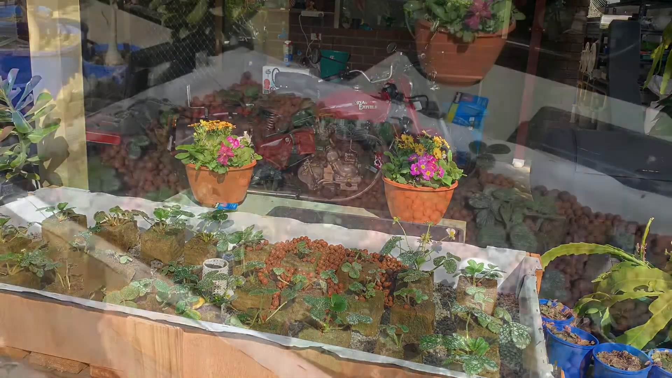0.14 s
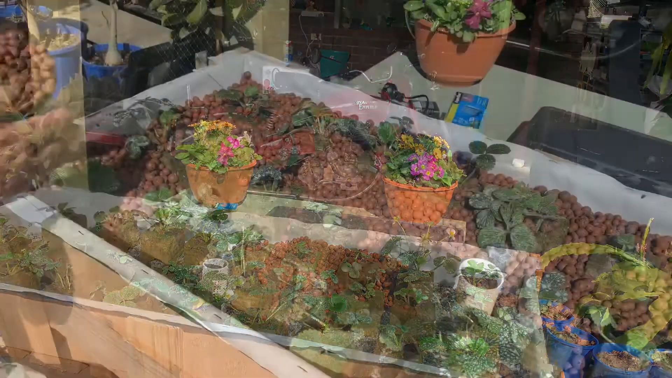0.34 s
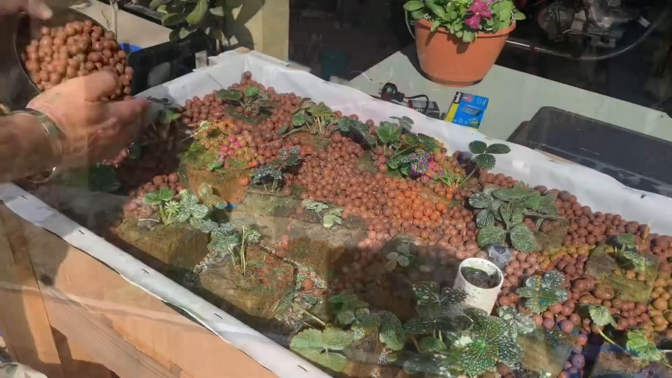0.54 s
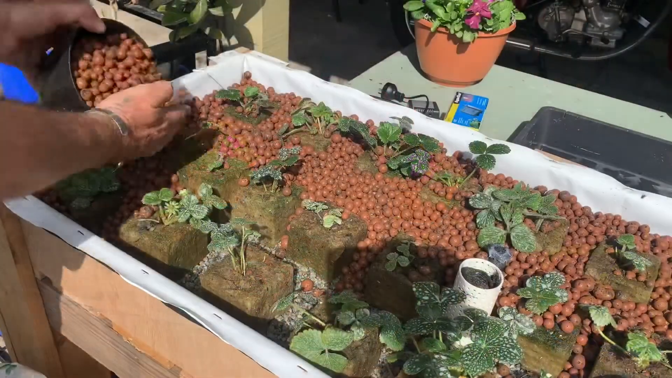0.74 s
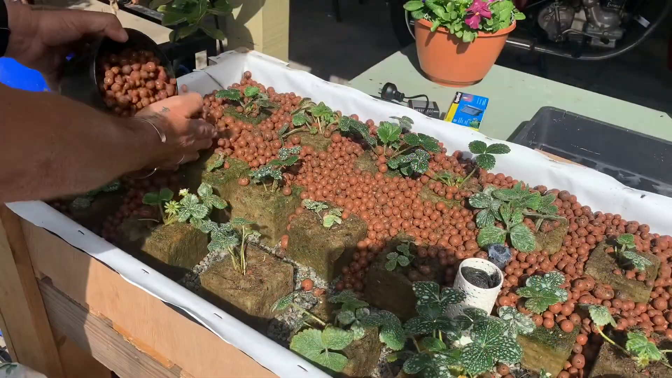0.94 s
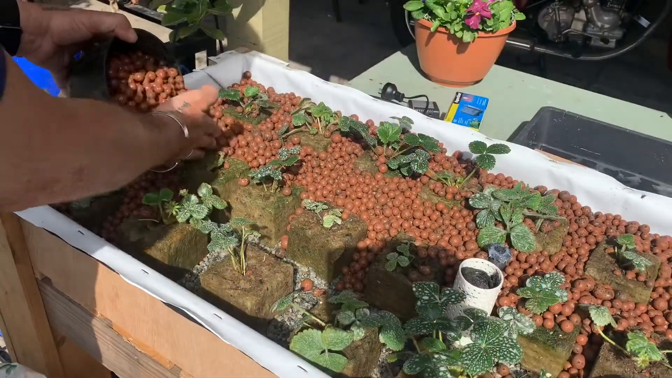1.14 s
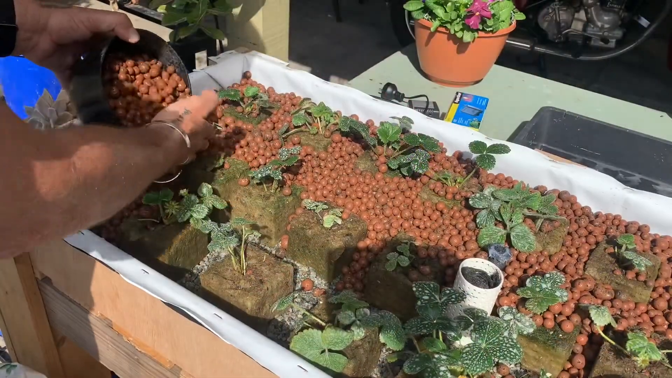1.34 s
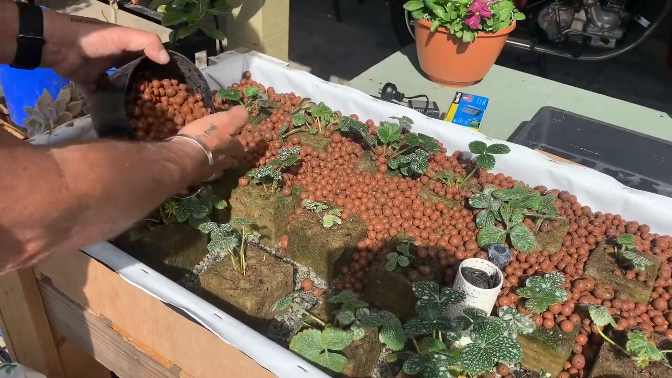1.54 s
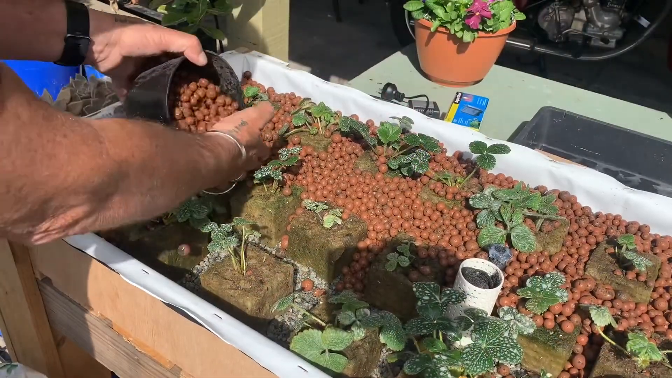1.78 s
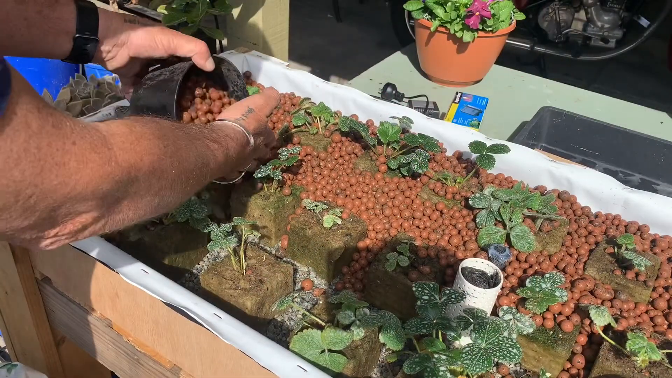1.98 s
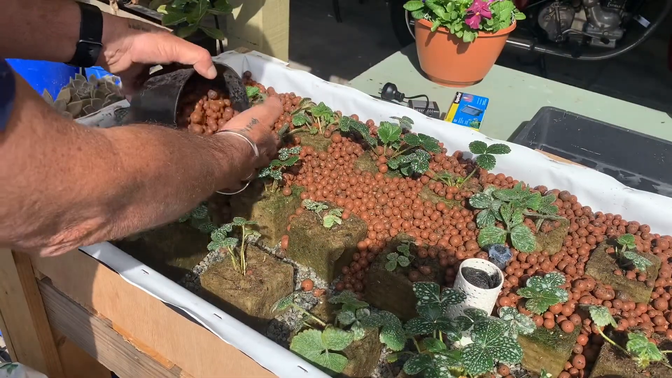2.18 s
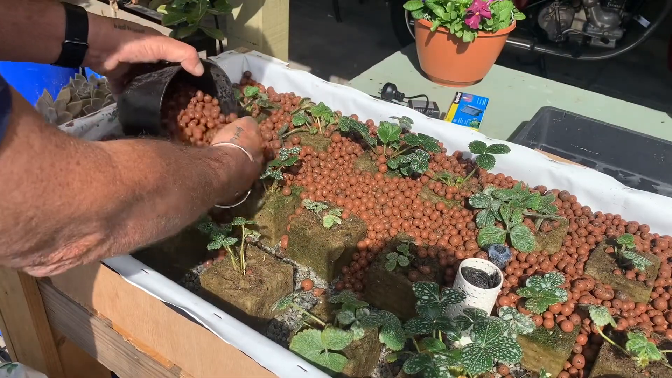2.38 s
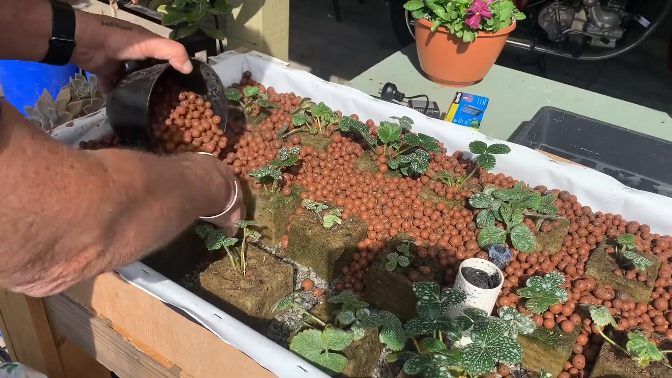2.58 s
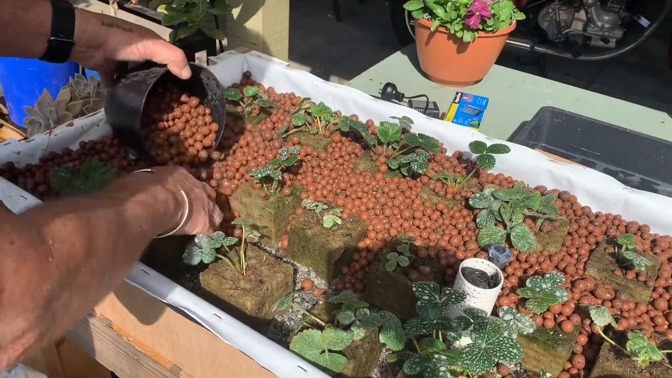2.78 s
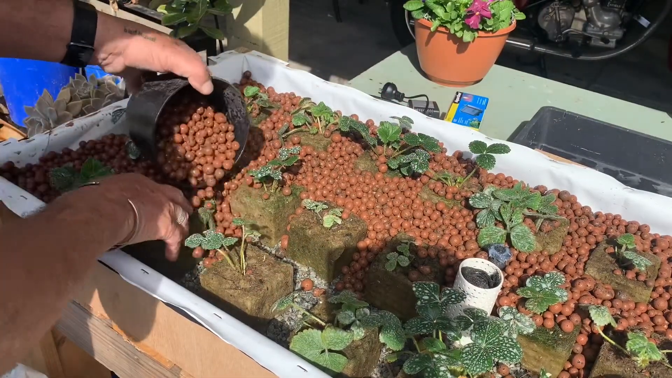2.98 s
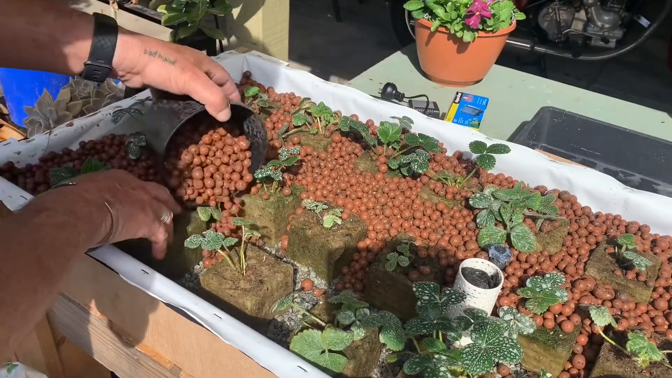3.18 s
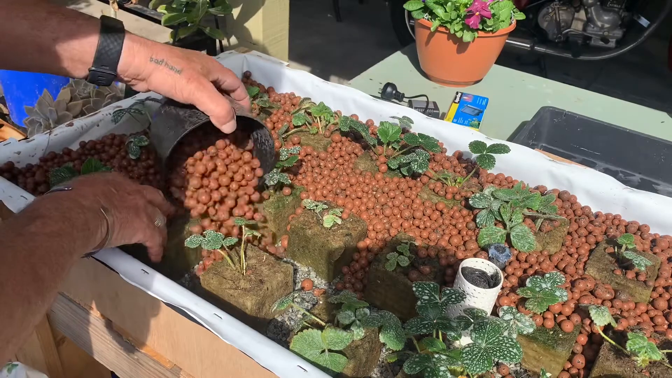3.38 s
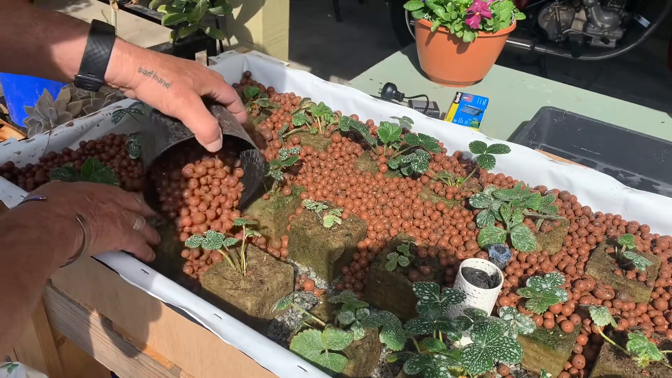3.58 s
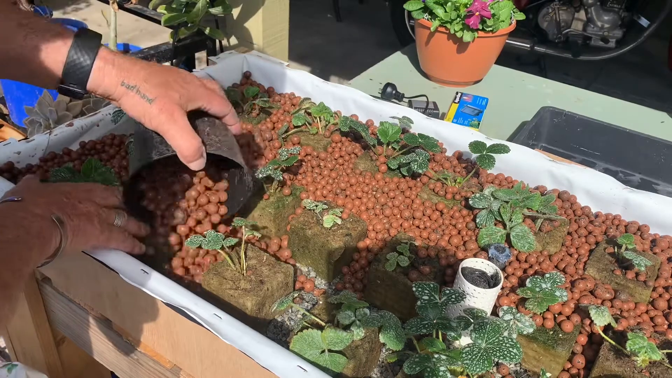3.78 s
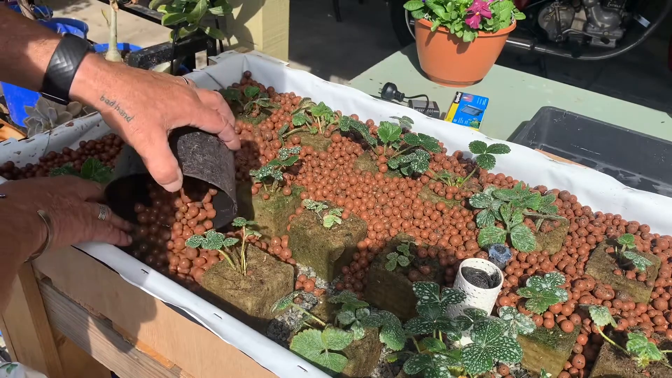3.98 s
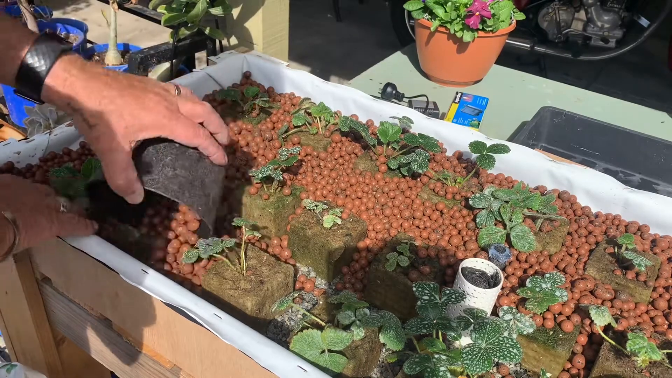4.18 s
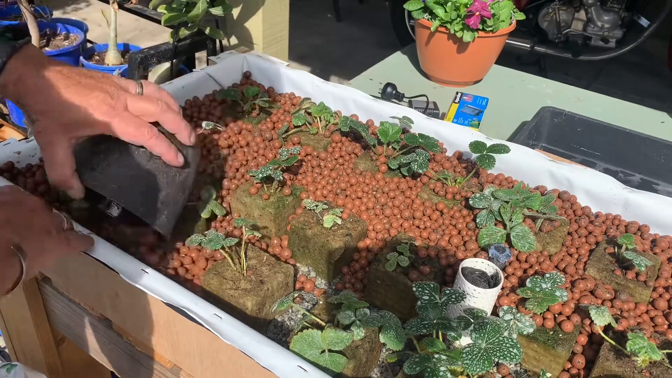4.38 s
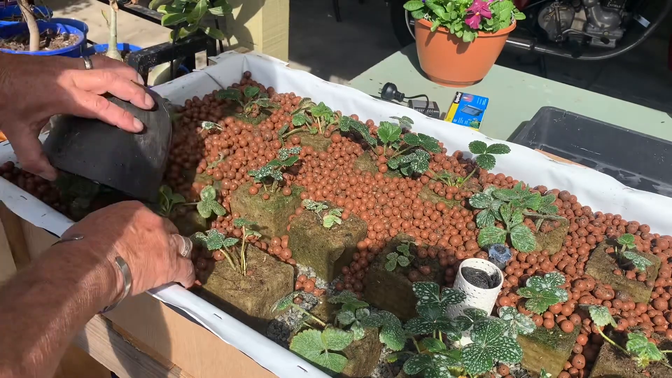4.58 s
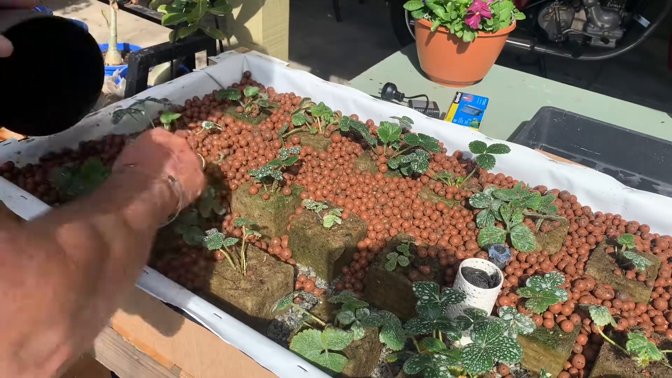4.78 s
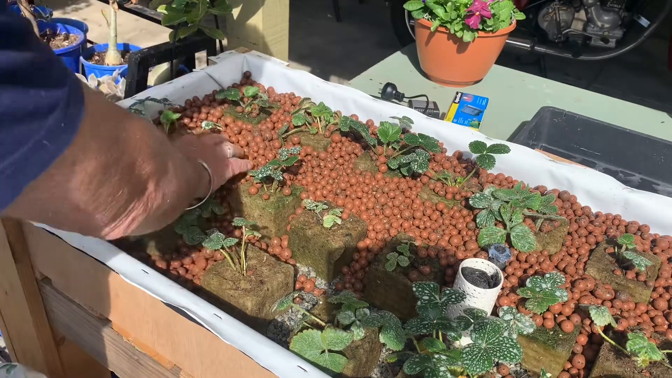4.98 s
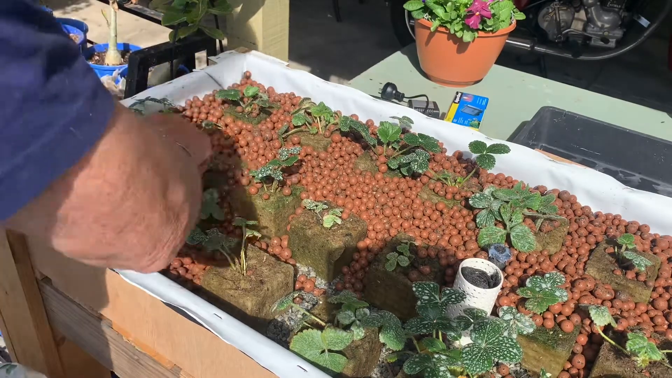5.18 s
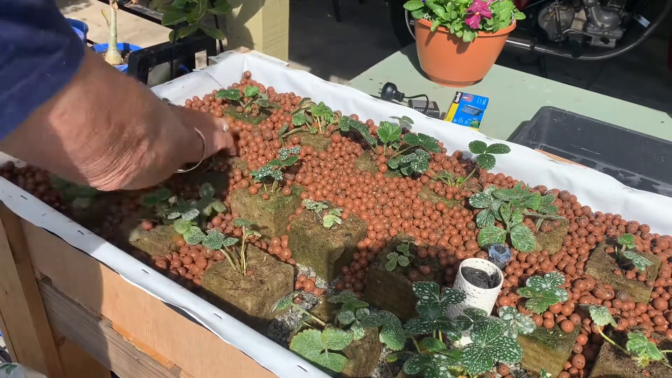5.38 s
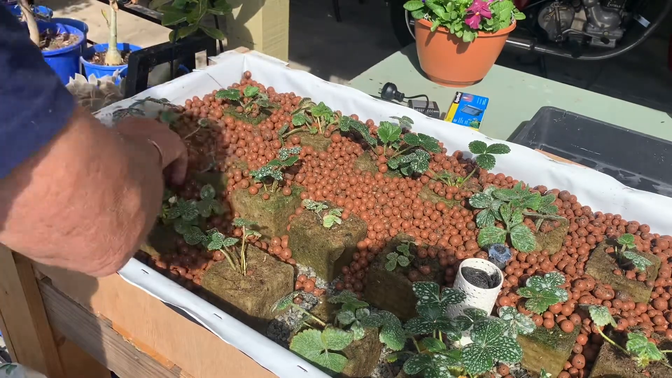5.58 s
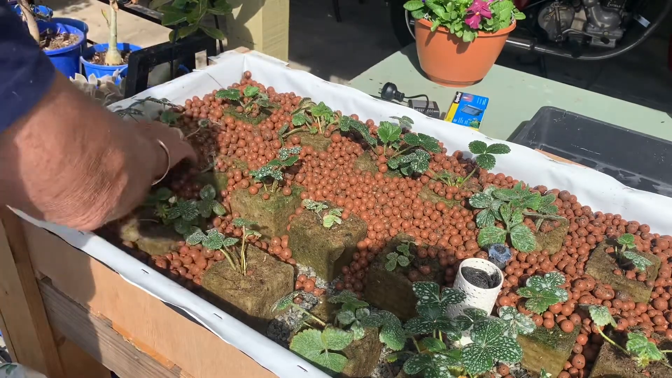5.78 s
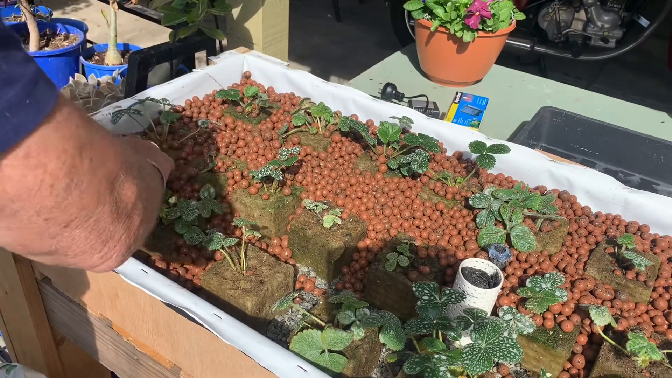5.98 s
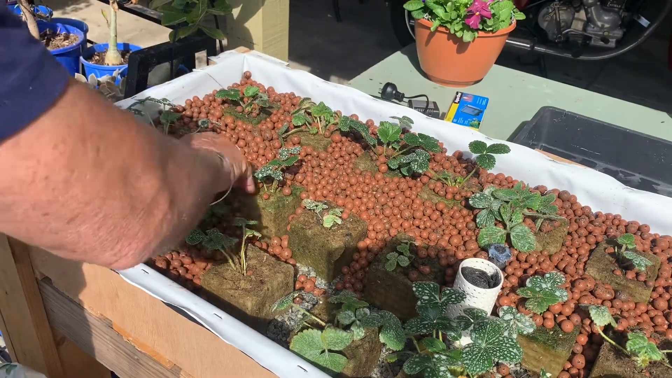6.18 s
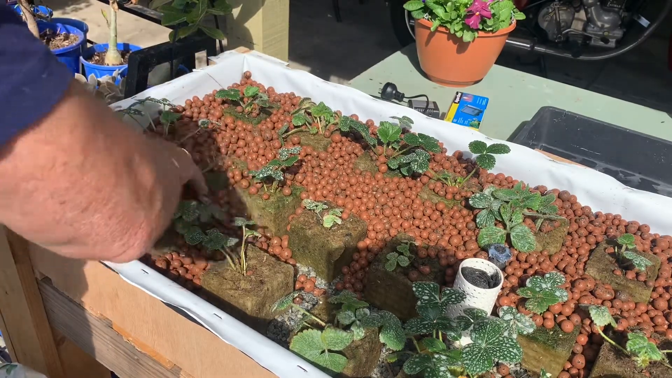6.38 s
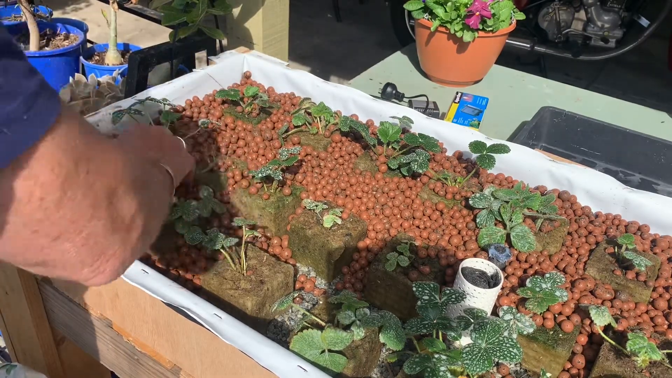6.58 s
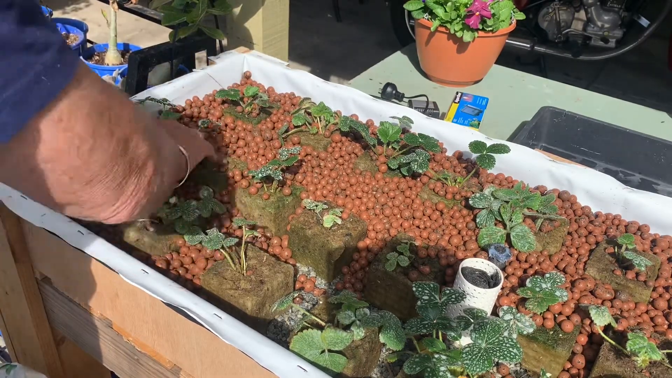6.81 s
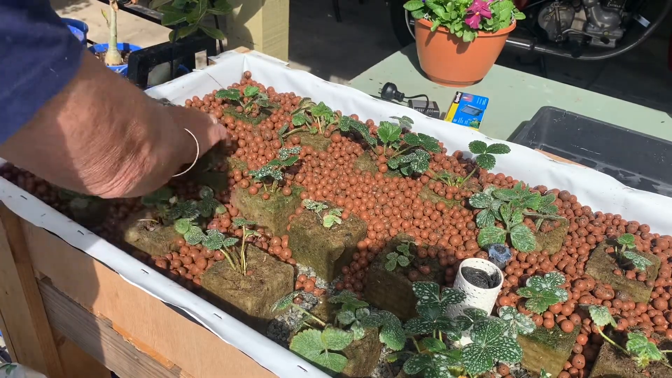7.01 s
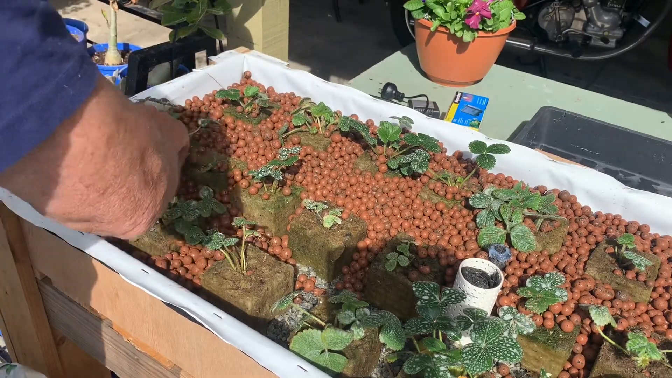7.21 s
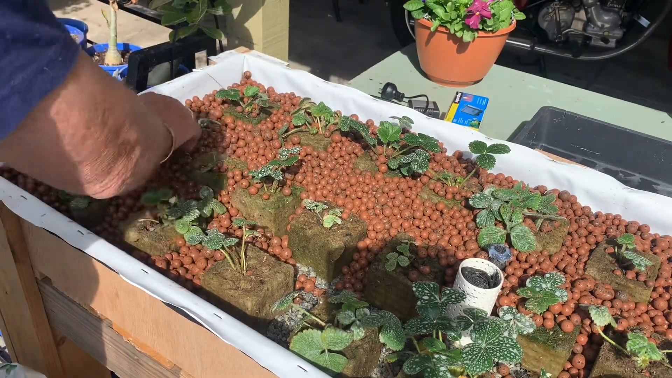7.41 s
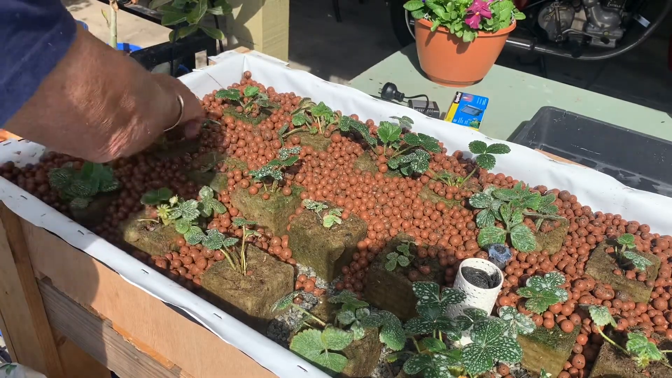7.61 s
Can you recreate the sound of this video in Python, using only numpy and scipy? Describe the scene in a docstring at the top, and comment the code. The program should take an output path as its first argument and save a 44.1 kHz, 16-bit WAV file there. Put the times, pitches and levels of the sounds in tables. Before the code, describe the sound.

Near-silence with faint traffic, then hard little clay balls tumble onto others, bright and brittle over a duller rattle. The flow eases to separate clicks, swells, then a second, fuller pour rushes out and drains with a hollow knock. Afterwards a hand spreads the pebbles in brief clicking swishes with small woody bumps, growing quieter. Outdoors, recorded close in wide stereo, dry and without echo.

```python
"""Clay pebbles poured from a pot

Fired clay pebbles slide out of a plastic pot onto a bed of more pebbles, then a hand spreads them, in a garden.
Each collision is a bright tick made of short, dying noise. The bed and the hollow pot answer with a duller
rattle, and knocks and thuds are bursts of noise sent through resonances. Far traffic rumbles below, with light
wind and a faint hum. Left and right hear it all with a phase difference and a share of their own that change
with pitch."""
import sys
import numpy as np
from scipy import signal
from scipy.fft import rfft, irfft, next_fast_len
from scipy.io import wavfile
from scipy.ndimage import uniform_filter1d

SR = 44100
rng = np.random.default_rng(int(sys.argv[2]) if len(sys.argv) > 2 else 0)


def dump_mix(stems):
    """Bounce the given channels to the path in sys.argv[1] as a 16-bit WAV at rate SR."""
    frames = np.atleast_2d(stems).T  # one column per channel
    limited = np.clip(frames, -1, 1)  # hard clip at full scale
    pcm = np.round(limited * 32767).astype(np.int16)
    wavfile.write(sys.argv[1], SR, pcm)


N = 337365
SIZE = next_fast_len(N + 8192)   # room for filter tails
HZ = np.maximum(np.fft.rfftfreq(SIZE, 1 / SR), 1)

# two pours out of the pot, how loud the stream ticks; each pour: time_s, level_db
POURS = [
    [(0.4, -73.5), (0.6, -43.5), (0.7, -35.5), (0.743, -27.5), (0.768, -33.5), (0.795, -31), (0.815, -30.5),
     (0.868, -28.5), (1.013, -34), (1.227, -36.5), (1.36, -41), (1.58, -43), (1.86, -41), (1.93, -42.5),
     (1.985, -32.5), (2.03, -39.5), (2.135, -32.5), (2.44, -36), (2.6, -39.5), (2.688, -33), (2.834, -47),
     (2.9, -56.5)],
    [(2.7, -94), (2.85, -45), (3.0, -42), (3.193, -30.5), (3.367, -26), (3.58, -27), (3.976, -32.5),
     (4.061, -32.5), (4.275, -36.5), (4.53, -50), (4.62, -54), (4.79, -58), (4.87, -74.5)],
]
# the hand pushes pebbles along: peak_time_s, peak_level_db, rise_db_per_s, fall_db_per_s
PUSHES = [(4.94, -46, 400, 62), (5.066, -37.5, 158, 50), (5.288, -34.5, 6000, 64), (5.39, -53, 111, 58),
          (5.467, -32, 95, 102), (5.852, -39, 39, 86), (6.005, -33.5, 123, 255), (5.7, -46.5, 75, 36),
          (6.114, -43, 55, 99), (6.174, -40.5, 297, 300), (6.295, -45, 500, 701), (6.231, -45, 95, 300),
          (6.352, -35.5, 1500, 159), (6.52, -56.5, 97.5, 97), (6.759, -40, 208, 215),
          (6.825, -47.5, 500, 171), (6.92, -47, 154, 360), (6.98, -56, 402, 39), (7.1, -46, 73, 69),
          (7.42, -62, 39, 100), (7.518, -54, 249, 201), (7.63, -55.5, 163, 20)]
# single pebbles that stand out: start_s, level_db (before the common lift)
SINGLE_PEBBLES = [(0.0074, -56), (0.1483, -56), (0.6344, -15), (0.7035, -11), (0.7208, -16), (0.7431, -14),
                  (0.7494, -6), (0.7536, -15), (0.7767, -20), (0.8, -11), (0.8069, -18), (0.8368, -13),
                  (0.86, -16), (0.8692, -13), (0.9122, -18), (0.9171, -15), (0.9814, -19), (1.0359, -22),
                  (1.1922, -24), (1.2188, -23), (1.2303, -21), (1.2501, -24), (1.2605, -22), (1.2911, -24),
                  (1.3211, -24), (1.3523, -27), (1.3598, -23), (1.3689, -20), (1.3783, -24), (1.3941, -28),
                  (1.4063, -26), (1.435, -28), (1.4753, -28), (1.4863, -21), (1.504, -25), (1.5276, -28),
                  (1.5355, -15), (1.5458, -28), (1.6083, -30), (1.6303, -28), (1.6528, -28), (1.6715, -16),
                  (1.6875, -28), (1.7069, -19), (1.7183, -26), (1.7246, -26), (1.7373, -24), (1.7514, -20),
                  (1.7642, -28), (1.7716, -16), (1.8187, -18), (1.8303, -22), (1.8352, -25), (1.8641, -18),
                  (1.8937, -19), (1.9168, -15), (1.9338, -25), (1.9646, -22), (1.9746, -12), (1.9791, -16),
                  (2.0003, -23), (2.006, -23), (2.027, -24), (2.042, -16), (2.0547, -23), (2.0612, -20),
                  (2.102, -19), (2.1157, -18), (2.1266, -19), (2.1401, -19), (2.1471, -17), (2.1657, -17),
                  (2.1737, -18), (2.1912, -21), (2.2252, -20), (2.2474, -17), (2.2513, -19), (2.294, -16),
                  (2.3134, -17), (2.3383, -21), (2.3441, -20), (2.3486, -14), (2.3579, -20), (2.4022, -21),
                  (2.4409, -19), (2.4806, -23), (2.5148, -22), (2.522, -24), (2.5272, -21), (2.5596, -22),
                  (2.5764, -25), (2.5992, -20), (2.6185, -24), (2.6301, -18), (2.6376, -18), (2.6629, -23),
                  (2.6858, -22), (2.701, -19), (2.7063, -19), (2.7296, -27), (2.7653, -29), (2.7851, -27),
                  (2.8208, -28), (2.8437, -23), (2.8522, -24), (2.8607, -17), (2.8892, -29), (2.8984, -24),
                  (2.9249, -28), (2.9354, -30), (2.9437, -27), (2.9485, -24), (2.9679, -28), (2.9872, -14),
                  (2.9981, -16), (3.0098, -20), (3.0173, -21), (3.0413, -24), (3.0533, -23), (3.0832, -16),
                  (3.1078, -18), (3.1221, -21), (3.1311, -14), (3.1616, -21), (3.1691, -17), (3.2235, -16),
                  (3.2395, -16), (3.2814, -14), (3.3251, -16), (3.3595, -14), (3.3789, -16), (3.3935, -14),
                  (3.4767, -14), (3.5199, -13), (3.5651, -13), (3.5838, -16), (3.6279, -14), (3.6544, -17),
                  (3.6767, -17), (3.725, -19), (3.7786, -14), (3.7988, -18), (3.8393, -17), (3.8646, -19),
                  (3.9079, -21), (3.9609, -21), (3.9882, -20), (4.0317, -19), (4.0464, -15), (4.073, -20),
                  (4.0808, -18), (4.1152, -21), (4.1277, -22), (4.1784, -23), (4.2085, -22), (4.2224, -21),
                  (4.2306, -22), (4.2353, -23), (4.2601, -18), (4.2747, -21), (4.2792, -24), (4.3194, -26),
                  (4.3238, -23), (4.3446, -22), (4.3721, -22), (4.3824, -22), (4.4034, -25), (4.4271, -25),
                  (4.4476, -29), (4.4586, -31), (4.4768, -26), (4.4957, -26), (4.5211, -28), (4.5701, -37),
                  (4.5783, -38), (4.6132, -29), (4.6321, -41), (4.6389, -30), (4.6425, -35), (4.6643, -38),
                  (4.667, -37), (4.6788, -29), (4.6995, -42), (4.7515, -32), (4.7771, -28), (4.8964, -41),
                  (4.9041, -26), (4.9757, -30), (5.007, -28), (5.0186, -29), (5.0249, -29), (5.0508, -22),
                  (5.0579, -21), (5.075, -23), (5.0812, -25), (5.0988, -23), (5.1157, -16), (5.155, -26),
                  (5.161, -19), (5.1693, -25), (5.2171, -33), (5.2512, -26), (5.2696, -31), (5.2927, -18),
                  (5.2982, -22), (5.336, -25), (5.3896, -22), (5.431, -24), (5.4408, -22), (5.5103, -25),
                  (5.5289, -25), (5.5507, -16), (5.5568, -21), (5.5754, -28), (5.5944, -30), (5.6039, -25),
                  (5.651, -28), (5.6636, -32), (5.6779, -27), (5.6911, -28), (5.6987, -20), (5.7159, -28),
                  (5.7215, -26), (5.7319, -30), (5.7377, -19), (5.7604, -26), (5.8685, -27), (5.8893, -28),
                  (5.9079, -28), (5.9488, -24), (5.9996, -24), (6.0069, -23), (6.0541, -27), (6.0862, -31),
                  (6.0949, -29), (6.1092, -24), (6.119, -22), (6.13, -30), (6.146, -29), (6.1603, -20),
                  (6.1718, -21), (6.1841, -29), (6.2082, -33), (6.2144, -30), (6.2193, -24), (6.2389, -29),
                  (6.2536, -37), (6.2639, -29), (6.2876, -27), (6.2921, -28), (6.3107, -34), (6.3489, -32),
                  (6.3628, -26), (6.3809, -32), (6.3875, -31), (6.4781, -35), (6.524, -35), (6.5437, -44),
                  (6.5535, -33), (6.5929, -49), (6.6574, -39), (6.6722, -36), (6.6825, -38), (6.7184, -33),
                  (6.7411, -34), (6.7598, -23), (6.7652, -24), (6.7715, -25), (6.7938, -34), (6.8195, -30),
                  (6.8525, -33), (6.8609, -30), (6.8725, -25), (6.8864, -35), (6.902, -35), (6.9186, -25),
                  (6.9326, -36), (6.9729, -21), (6.9974, -38), (7.0416, -32), (7.0703, -35), (7.0817, -28),
                  (7.0928, -29), (7.1052, -30), (7.1145, -37), (7.1278, -24), (7.1515, -32), (7.1601, -28),
                  (7.1687, -27), (7.1816, -34), (7.1977, -38), (7.2542, -42), (7.2822, -36), (7.3156, -45),
                  (7.3211, -44), (7.3537, -37), (7.3623, -48), (7.371, -38), (7.4085, -39), (7.4135, -41),
                  (7.4345, -40), (7.4833, -46), (7.4993, -44), (7.5064, -35), (7.5152, -36), (7.5235, -42),
                  (7.5613, -47), (7.5939, -34), (7.6104, -27), (7.6248, -45)]
# ringing modes of one pebble, before small random changes: pitch_hz, width_hz, level_db
PEBBLE_MODES = [(6070, 4000, -14.5), (9530, 3450, 5), (14000, 2200, -11.5)]
# colour of the streaming ticks: pitch_hz, gain_db (noise power per Hz)
TICK_COLOUR = [(1500, -45), (3000, -16), (5200, -11), (6400, -6.5), (7700, -3.5), (9000, -1.5), (10500, -3),
               (12000, -10.5), (14000, -10), (16000, -30)]
# colour of the bed's rattle: pitch_hz, gain_db (noise power per Hz)
RATTLE_COLOUR = [(40, -44.5), (110, -5.5), (220, -10.5), (500, -6), (900, -6), (1800, -4), (3000, 2.5),
                 (4500, -6.5), (7000, -11.5)]
# rattle while tipping, pouring, emptying and spreading:
# start_s, level_db (at a middling flow), share (of the flow's swing in dB)
RATTLE_STAGES = [(0, -43, 0.48), (1.55, -43.5, 0.68), (2.95, -42.5, 0.7777), (4.6, -53, 0.56)]
# ringing hollows: full pot tilting, pot half lying, pot tipped over and emptying, wooden trough under the hand:
# start_s, level_db (against the bed), modes (each pitch_hz, width_hz, level_db)
HOLLOWS = [(0, -10.5, [(690, 95, 3.5), (1540, 100, 2), (362, 72, -10)]), (1.45, -3.5, [(676, 79, 4),
           (1582, 100, 4), (516, 230, -6.5)]), (2.951, -5, [(600, 310, 1.5), (1240, 190, -1.5),
           (1870, 220, 3), (2550, 310, -20)]), (4.6, 2.5, [(650, 320, 5), (380, 200, 1.5),
           (1100, 260, -9.5), (2280, 900, -10.5)])]
# pebbles knocking dully on a wall: start_s, peak_level_db
WALL_KNOCKS = [(0.721, -23.5), (1.035, -27.5), (1.156, -21.5), (1.226, -23), (1.395, -36.5), (1.801, -20.5),
               (1.971, -27), (2.377, -34), (3.18, -22.5), (4.037, -32), (4.254, -46), (6.163, -32),
               (6.349, -33.5), (6.974, -35)]
# pot and hand bumping, heaps dropping: start_s, peak_level_db, pitch_hz, puff_t60_s (time to fall 60 dB)
BUMPS = [(.008, -42, 2220, 0.0079), (0.146, -49, 764, 0.053), (.146, -46, 3250, 0.07),
         (0.243, -52.5, 800, 0.033), (0.52, -41, 134, 0.054), (0.559, -42.5, 98, 0.14),
         (0.753, -34.5, 392, 0.042), (0.87, -33.5, 960, 0.056), (1.036, -34, 724, 0.085),
         (3.298, -36, 235, 0.28), (4.0349, -25, 516, 0.36), (4.036, -29, 860, 0.096),
         (4.037, -28.5, 1320, 0.05), (4.06, -32, 397, 0.44), (4.049, -34, 212, 0.53),
         (4.446, -40, 1250, .03), (4.629, -46, 1210, .015), (4.666, -45, 900, .02),
         (4.776, -46.5, 1520, 0.034), (5.185, -46, 650, .04), (5.288, -38.5, 710, 0.17),
         (5.312, -36, 440, 0.037), (5.815, -40.5, 615, 0.054), (5.84, -47, 656, .04),
         (5.87, -42, 730, 0.072), (5.992, -40.5, 600, 0.058), (6.108, -45, 616, 0.027),
         (6.158, -41, 520, .03), (5.29, -49, 199, 0.22), (6.902, -39, 170, 0.07), (7.622, -49, 1070, 0.052),
         (7.644, -33, 615, 0.089)]
# colour of the garden background: pitch_hz, gain_db (noise power per Hz)
GARDEN_COLOUR = [(15, -21), (35, -15), (64, 2), (110, 1), (200, -7), (400, -13.5), (900, -23.5),
                 (1500, -19), (4000, -26), (8400, -28), (11000, -56), (16000, -80)]
# light wind on the ports: time_s, level_db
WIND = [(0.0, -59), (0.36, -58.5), (0.91, -88), (4.47, -60), (5.52, -61.5), (7.37, -69), (7.65, -52)]
# the two ports: pitch_hz, left_lead_rad, alike_share (0 to 1, heard alike by both), left_over_right_db
PORTS = [(0, 0, .92, -1), (130, 0, .92, -1.3), (300, .7, .75, -0.5), (900, .8, .55, 3.5),
         (1600, 2.2, .5, 0.1), (2300, 3.1, .6, 0.1), (2900, 3.4, .75, -1), (4600, 6.1, .45, -2),
         (5700, 5.3, .42, -5), (6500, 4.6, .4, -1), (7000, 3.0, .62, 0.5), (9100, 0.05, .9, 0.1),
         (10400, -1.5, .72, 0.1), (11300, -3.0, .97, 0.1), (12000, -3.2, .97, 0.1), (12700, -4.4, .6, 0.1),
         (13500, -6.2, .95, 0.1), (14500, -6.4, .85, 0.1), (16000, -9.3, .6, 0.1)]

REST_DB, MIDDLING_DB = -81.5, -40   # ticking of the bed left alone; a middling flow
TICK_LIFT_DB = 0.7                  # raises all single pebbles over the stream
CRACK_T60_S, SCATTER_T60_S, SCATTER_DB = 0.0017, 0.029, 6
GARDEN_DB, HUM_HZ, HUM_DB = -57, 301, -69
EDGE_HZ, CUTOFF_HZ = 15750, 16600


def amp(db):
    """Turn decibels into gain."""
    return 10 ** (np.asarray(db) / 20)


def rms_one(x):
    """Scale to unit power."""
    return x / np.sqrt(np.mean(x ** 2) + 1e-20)


def colour(x, points):
    """Shape by a smooth spectrum, with the causal (minimum) phase that belongs to it."""
    hz, db = np.transpose(points)
    gain = amp(np.interp(np.log(HZ), np.log(hz), db))
    # folding the cepstrum forward in time makes the filter causal
    cepstrum = irfft(np.log(gain), SIZE)
    cepstrum[1:SIZE // 2] *= 2
    cepstrum[SIZE // 2 + 1:] = 0
    response = np.exp(rfft(cepstrum))
    return irfft(rfft(x, SIZE) * response, SIZE)[..., :N]


def drift(rate_hz):
    """Slow random wander with unit power: noise smoothed twice."""
    r = np.exp(-2 * np.pi * rate_hz / SR)
    smooth = signal.lfilter([1], [1, -2 * r, r * r], rng.standard_normal(N + SR))
    return rms_one(smooth[SR:])   # the first second lets the filter settle


def resonance(x, hz, width_hz):
    """Ring around one pitch: a band-pass with a gain of about 1 at its top."""
    r = np.exp(-np.pi * width_hz / SR)
    top = np.array([1, 0, -1]) * (1 - r * r) / 2
    return signal.lfilter(top, [1, -2 * r * np.cos(2 * np.pi * hz / SR), r * r], x)


def bursts(power, t60):
    """Each impact starts a dying puff of noise; two unrelated versions share one envelope."""
    r = amp(-120 / (t60 * SR))   # power falls 60 dB in t60
    envelope = np.sqrt(signal.lfilter([1 - r], [1, -r], power + 1e-18))
    return envelope * rng.standard_normal((2, N))


def flow():
    """Level of the moving pebbles in dB: pours and pushes add their power."""
    t = np.arange(N) / SR
    power = amp(2 * REST_DB)
    for pour in POURS:
        pour_db = np.interp(t, *np.transpose(pour), -200, -200)   # silent outside the pour
        power = power + amp(2 * pour_db)
    for peak_s, db, rise, fall in PUSHES:
        drop_db = np.where(t < peak_s, rise * (peak_s - t), fall * (t - peak_s))
        power = power + amp(2 * (db - drop_db))
    return 10 * np.log10(power)


def collisions(per_s, spread_db, clump_db):
    """Impact energies at random moments, in clumps; energy per hit falls as the hits get more frequent."""
    per_s = np.clip(per_s, 20, 20000)
    clumps = amp(clump_db * np.maximum(drift(25.0), -1))
    chance = per_s * clumps / SR
    energy = amp(2 * spread_db * np.minimum(rng.exponential(1, N), 2.8))
    return (rng.random(N) < chance) * energy / energy.mean() * SR / per_s


def ticks(hits, count=5):
    """A short crack at the pitch of the pebble's size and a longer scatter off its neighbours."""
    size = rng.integers(0, count, N)
    crack = 0
    for k, hz in enumerate(np.geomspace(3500, 14000, count)):
        puffs = bursts(hits * (size == k), CRACK_T60_S)
        crack = crack + resonance(puffs, hz, 0.22 * hz) / np.sqrt(hz)
    scatter = amp(SCATTER_DB) * rms_one(bursts(hits, SCATTER_T60_S))
    return rms_one(colour(rms_one(crack) + scatter, TICK_COLOUR))


def single_ticks(widen=2.34, dull_db=-16, length=1024):
    """A hard crack ringing in the pebble's three modes, its scatter and a dull knock on the heap."""
    out, t = np.zeros((2, N + length)), np.arange(length) / SR
    dull = signal.butter(1, [600, 4500], "band", fs=SR)
    for s, db in SINGLE_PEBBLES:
        crack, scatter, knock = rng.standard_normal((3, 2, length))
        # the last noise samples, all but faded out of the sound, also serve as this pebble's random draws
        size_draw, knock_draw, *mode_draws = scatter[0, -1], *knock[0, :-5:-1]
        pitch_factor = amp(0.4 * np.clip(size_draw, -2, 2))   # pebbles differ in size
        blow = np.sign(crack) * amp(-60 * t / 0.005) + scatter * amp(-13 - 60 * t / 0.034)
        modes = []
        for k, (hz, width, mode_db) in enumerate(PEBBLE_MODES):
            change_db = 2.7 * (k != 1) * mode_draws[k]   # the middle mode stays the reference
            wide = resonance(blow, hz * pitch_factor, widen * width)
            modes.append(amp(mode_db + change_db) * resonance(wide, hz * pitch_factor, width))
        low = signal.lfilter(*dull, knock * amp(-60 * t / 0.0026))
        low_gain = amp(dull_db + 0.56 * knock_draw)
        tick = sum(modes) / np.abs(modes[1]).max(1, keepdims=True)
        tick = tick + low_gain * low / np.abs(low).max(1, keepdims=True)
        first = round(s * SR)
        out[:, first:first + length] += amp(db + TICK_LIFT_DB) * tick
    return out[:, :N]


def bed(hits, count=7):
    """The heap answers each impact duller and longer, each spot at a pitch of its own."""
    spot = rng.integers(0, count, N)
    spots = 0
    for k, hz in enumerate(np.geomspace(200, 5000, count)):
        puffs = bursts(hits * (spot == k), 26.0 / hz)   # low spots die away more slowly
        spots = spots + resonance(puffs, hz, 0.56 * hz) / np.sqrt(hz)
    spread = amp(6.5) * rms_one(bursts(hits, 0.053))
    return rms_one(colour(rms_one(spots) + spread, RATTLE_COLOUR))


def hollow(hits):
    """Pebbles knocking on the walls set the enclosed air ringing."""
    puffs, out = bursts(hits, 0.024), np.zeros((2, N))
    for start, level_db, modes in HOLLOWS:
        ringing = rms_one(sum(amp(db) * resonance(puffs, hz, width) for hz, width, db in modes))
        first = round(start * SR)
        out[:, first:] = amp(level_db) * ringing[:, first:]   # each hollow replaces the one before
    return out


def rattle_level(flow_db):
    """The rattle follows a share of the flow's swing, from a level of its own at each stage."""
    out = np.zeros(N)
    for start, db, share in RATTLE_STAGES:
        first = round(start * SR)
        out[first:] = db + share * (flow_db[first:] - MIDDLING_DB)
    return uniform_filter1d(out, size=400)   # soften the steps between stages


def knocks(t60=0.013, length=2048):
    """A pebble on a wall: a short dull burst around the middle of the range."""
    out, t = np.zeros((2, N + length)), np.arange(length) / SR
    for s, db in WALL_KNOCKS:
        puff = rng.standard_normal((2, length)) * amp(-60 * t / t60)
        knock = resonance(puff, 1900, 3300)
        first = round(s * SR)
        out[:, first:first + length] += amp(db) * knock / np.abs(knock).max(1, keepdims=True)
    return out[:, :N]


def thuds(length=8192):
    """A bump: a broad resonance kicked by a dying puff of noise."""
    out, t = np.zeros((2, N + length)), np.arange(length) / SR
    for s, db, hz, t60 in BUMPS:
        puff = rng.standard_normal((2, length)) * amp(-60 * t / t60)
        thud = resonance(resonance(puff, hz, 0.99 * hz), hz, 0.31 * hz)
        first = round(s * SR)
        out[:, first:first + length] += amp(db) * thud / np.abs(thud).max(1, keepdims=True)
    return out[:, :N]


def garden():
    """Coloured noise for distant rumble and hiss swelling a little, low noise for wind, narrow noise for a hum."""
    t = np.arange(N) / SR
    swell = amp(GARDEN_DB + 2.0 * drift(7.8))
    far = swell * rms_one(colour(rng.standard_normal((2, N)), GARDEN_COLOUR))
    low_noise = resonance(resonance(rng.standard_normal((2, N)), 59.0, 25), 38, 42)
    wind = amp(np.interp(t, *np.transpose(WIND))) * rms_one(low_noise)
    hum = amp(HUM_DB) * rms_one(resonance(rng.standard_normal((2, N)), HUM_HZ, 5.9))
    return far + wind + hum


def ports(pair):
    """The right port hears the left sound shifted in phase, mixed with an unrelated version of it."""
    hz, *columns = np.transpose(PORTS)
    lead, alike, balance_db = (np.interp(HZ, hz, column) for column in columns)
    alike = np.clip(alike, 0, 1)
    shared, own = rfft(pair, SIZE)
    right = alike * shared * np.exp(-1j * lead) + np.sqrt(1 - alike ** 2) * own
    left_and_right = [shared * amp(balance_db / 2), right * amp(-balance_db / 2)]
    return irfft(left_and_right, SIZE)[:, :N]


def scene():
    """Pebbles, rattle and garden reach the two ports together."""
    ticks_db = flow()
    per_s = 1200 * amp(0.32 * (ticks_db - MIDDLING_DB))   # a louder flow holds more collisions a second
    hits = collisions(per_s, spread_db=2.5, clump_db=2.27)
    wall_hits = collisions(0.6 * per_s, spread_db=2.0, clump_db=3.0)
    rattle = rms_one(bed(hits + wall_hits) + hollow(0.2 * hits + wall_hits))
    stream = amp(ticks_db) * ticks(hits) + amp(rattle_level(ticks_db)) * rattle
    background = knocks() + thuds() + garden()
    return ports(stream + background + single_ticks())


def record(dry):
    """Two steep low-pass filters, one after the other, cut the top of the treble."""
    edge = signal.sosfilt(signal.ellip(9, 0.5, 30, EDGE_HZ, fs=SR, output="sos"), dry)
    return signal.sosfilt(signal.cheby2(16, 35, CUTOFF_HZ, fs=SR, output="sos"), edge)


dry = scene()
out = record(dry)
dump_mix(out)
```